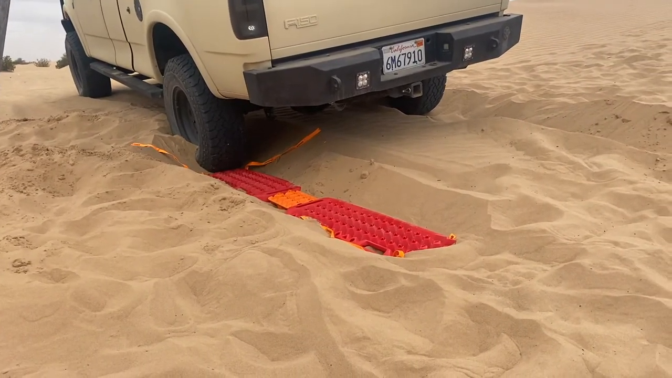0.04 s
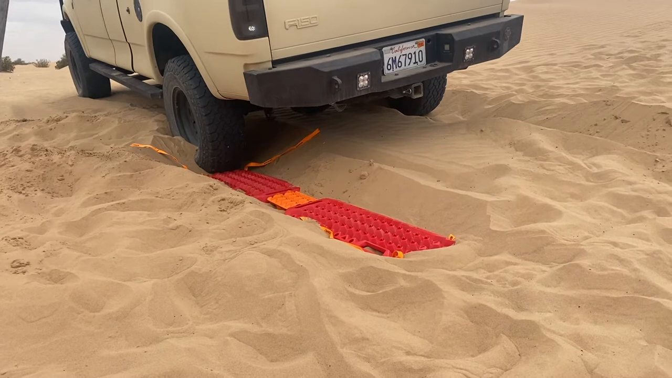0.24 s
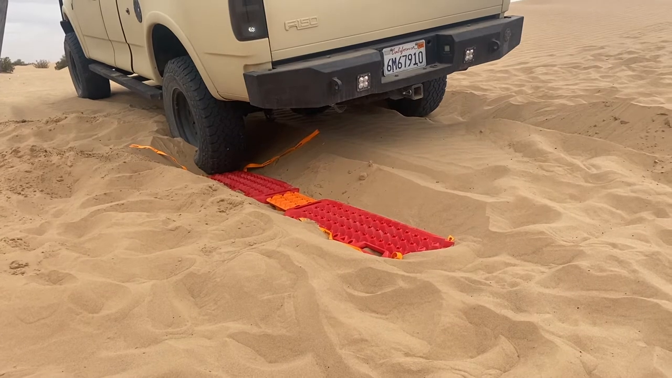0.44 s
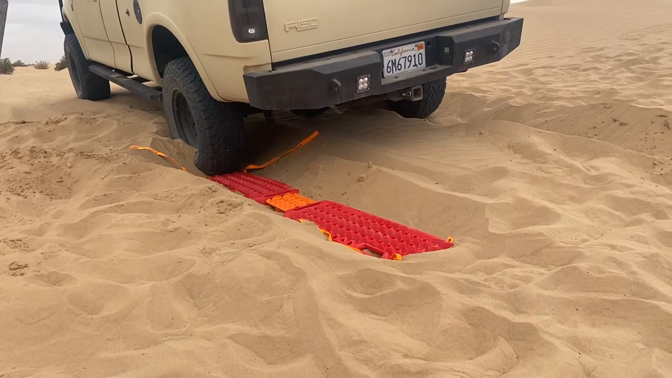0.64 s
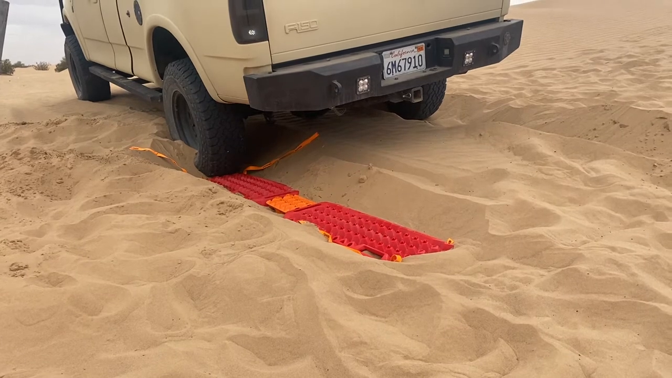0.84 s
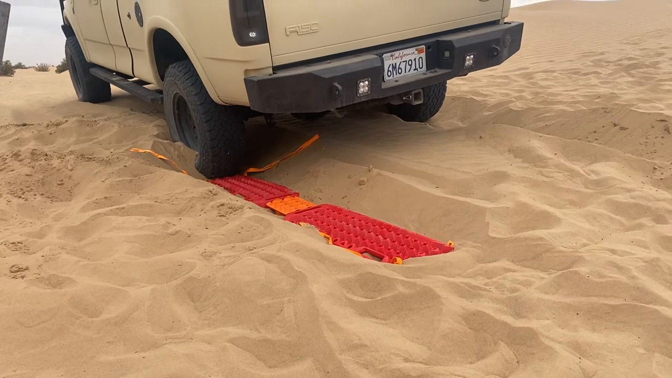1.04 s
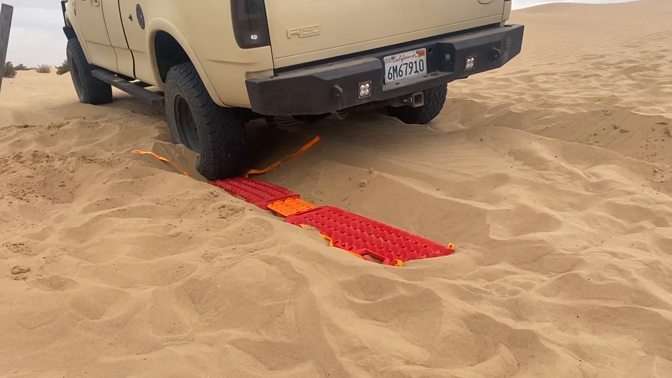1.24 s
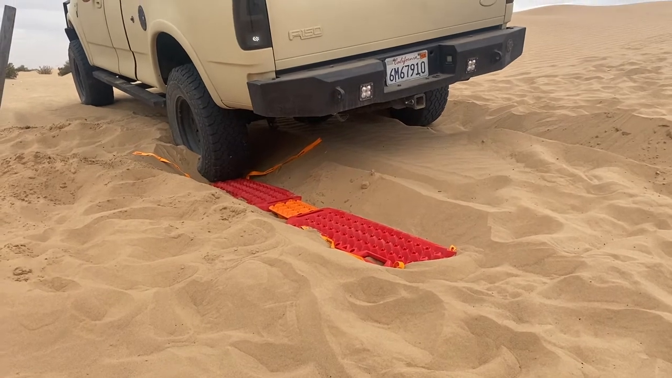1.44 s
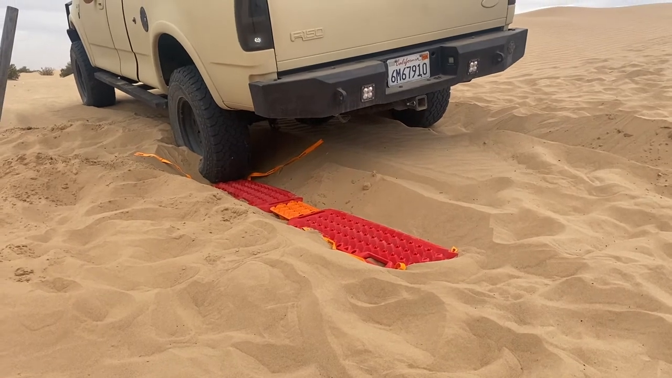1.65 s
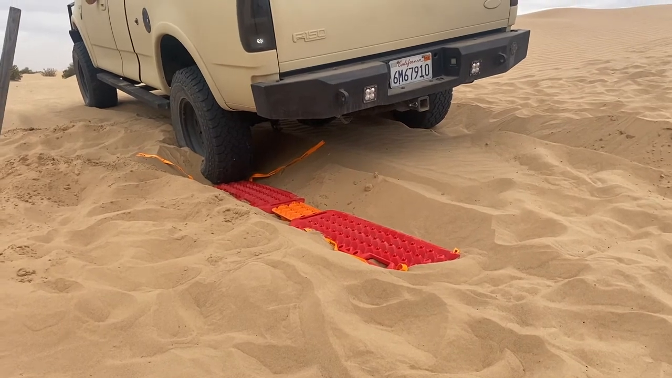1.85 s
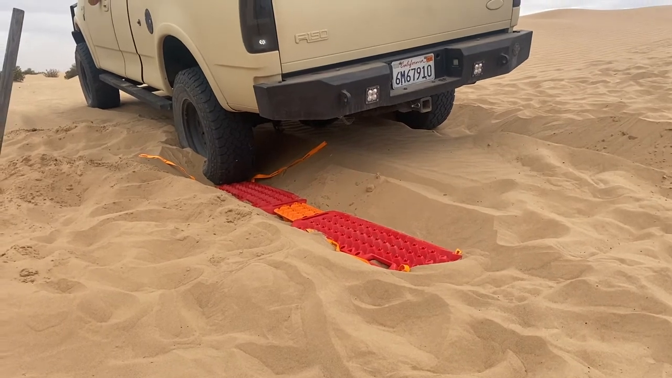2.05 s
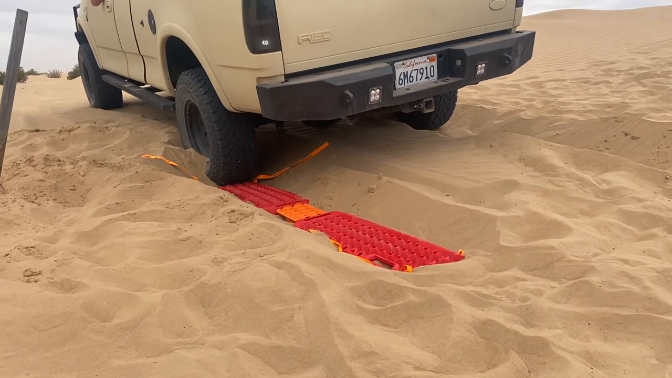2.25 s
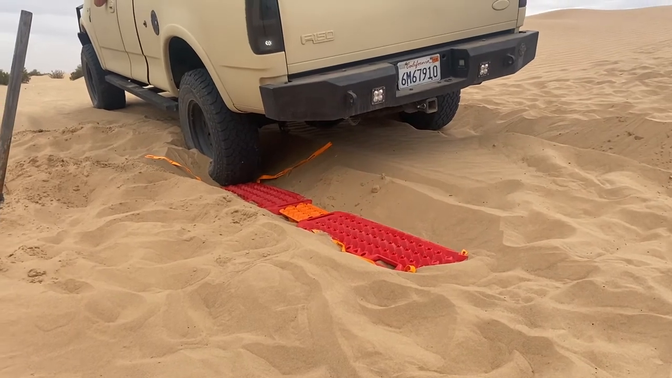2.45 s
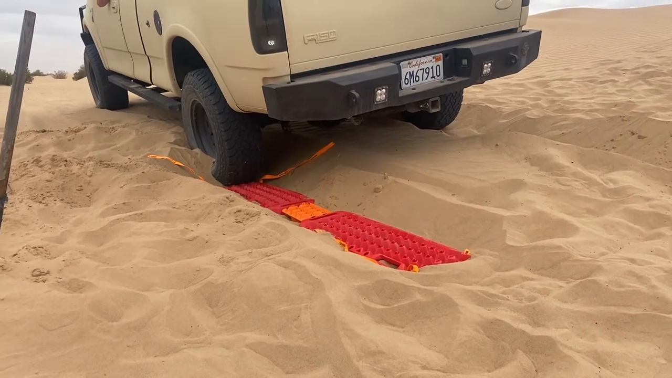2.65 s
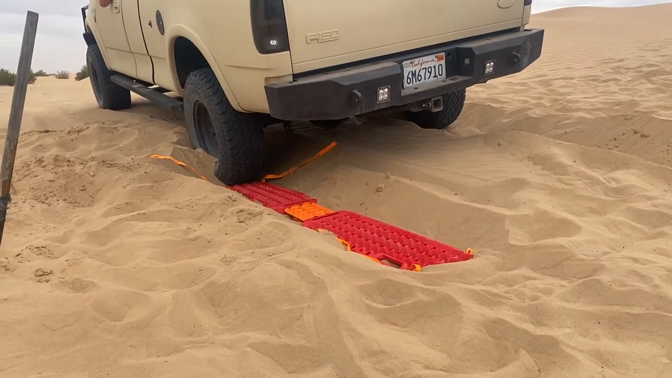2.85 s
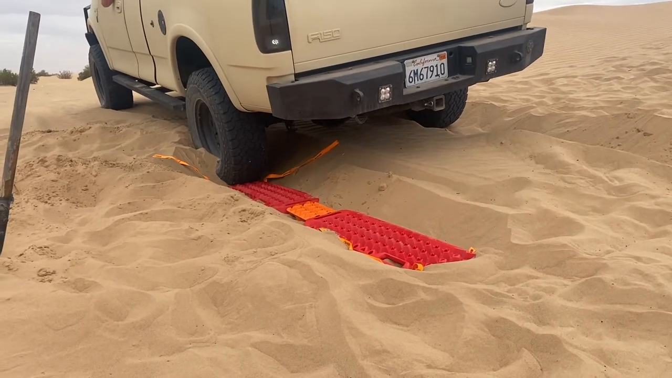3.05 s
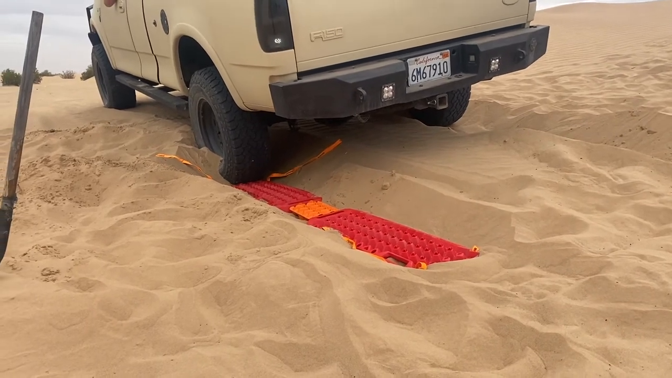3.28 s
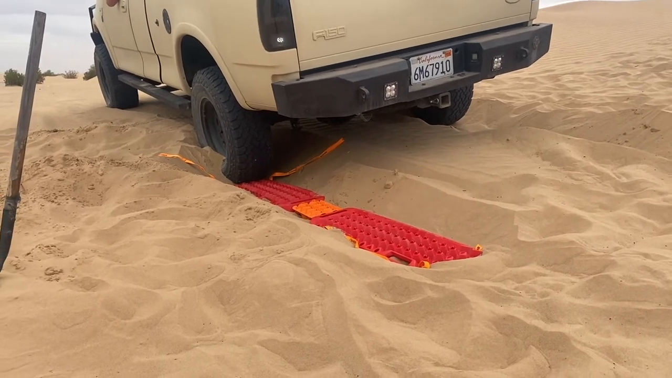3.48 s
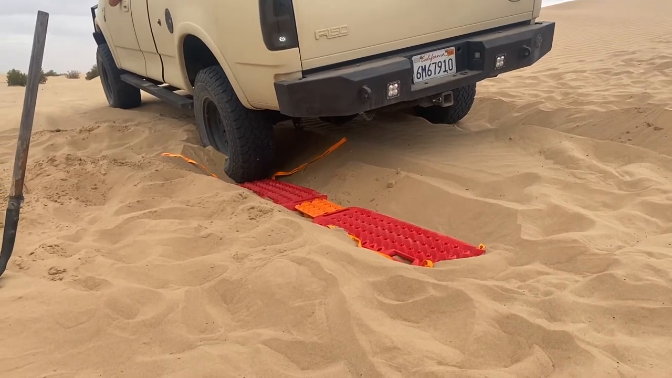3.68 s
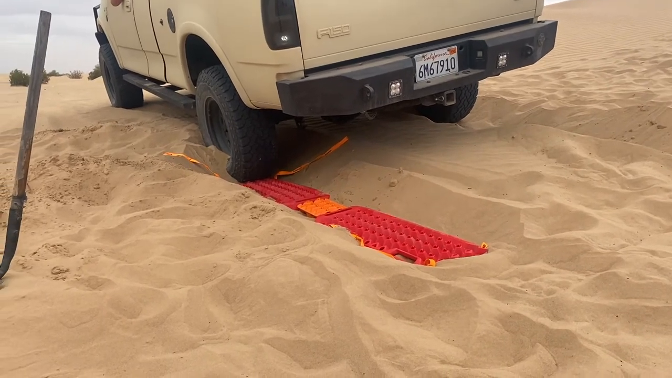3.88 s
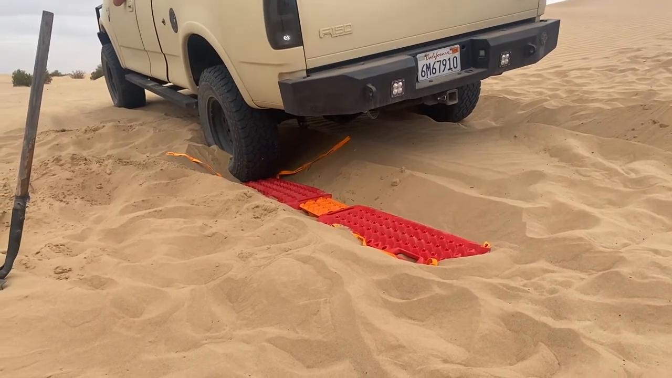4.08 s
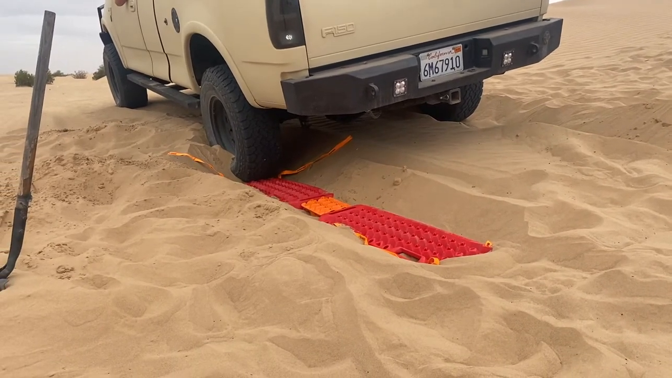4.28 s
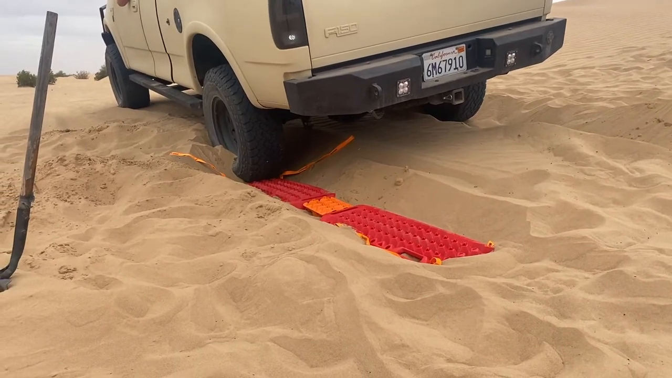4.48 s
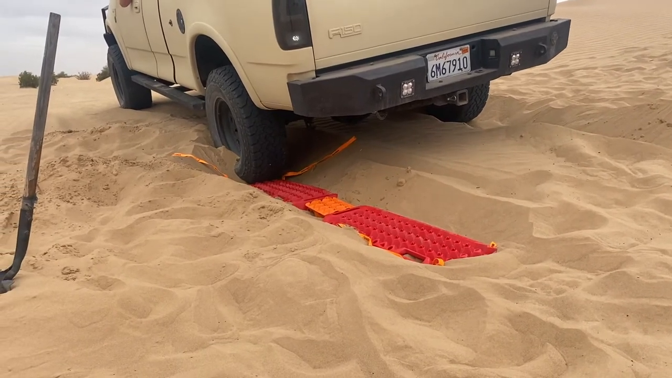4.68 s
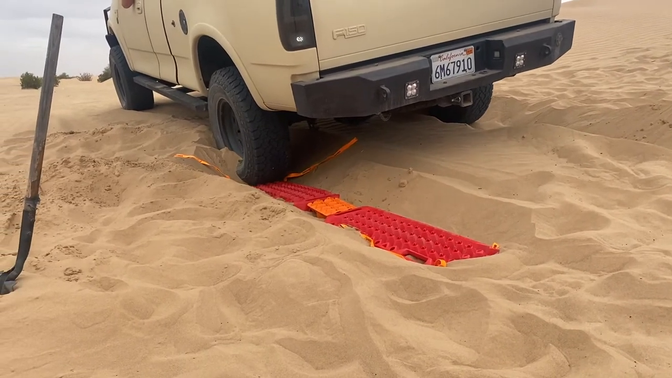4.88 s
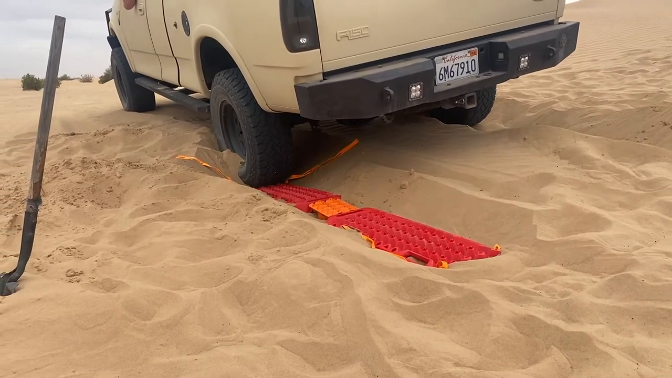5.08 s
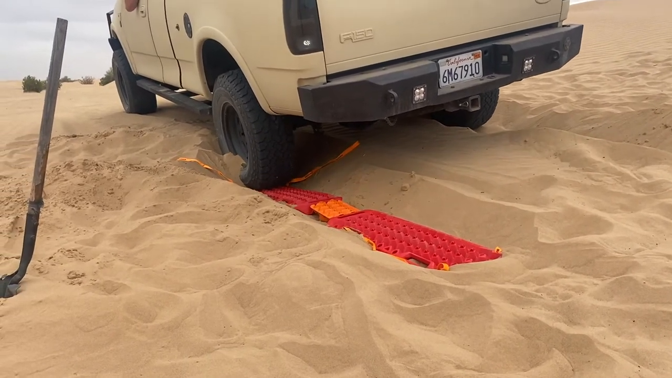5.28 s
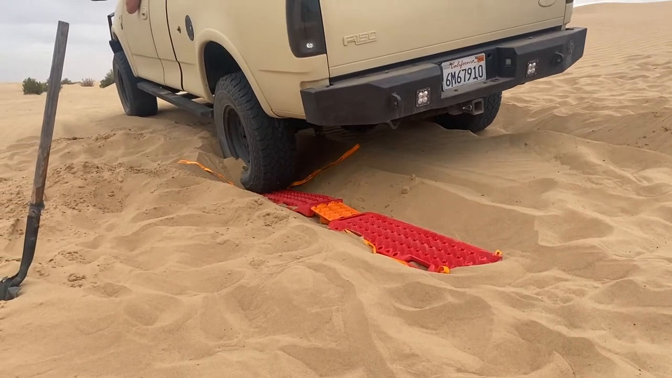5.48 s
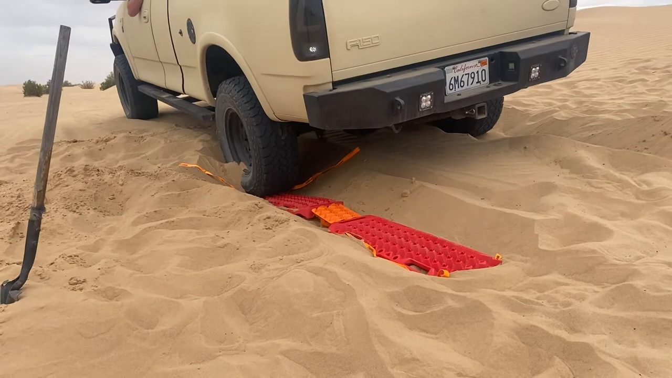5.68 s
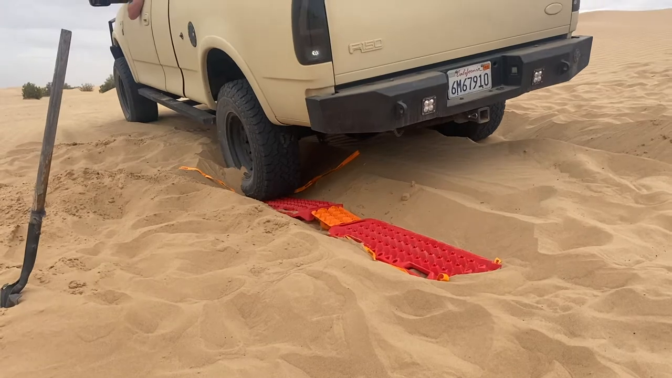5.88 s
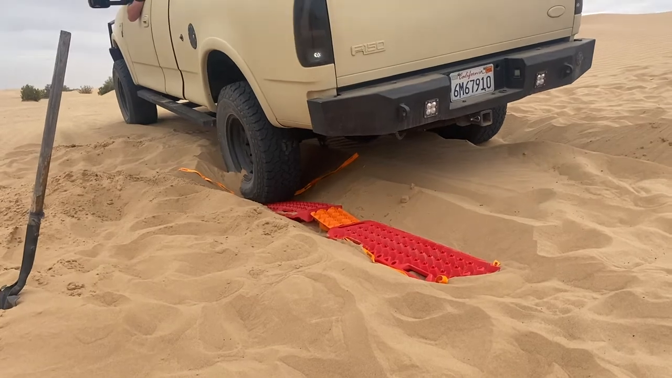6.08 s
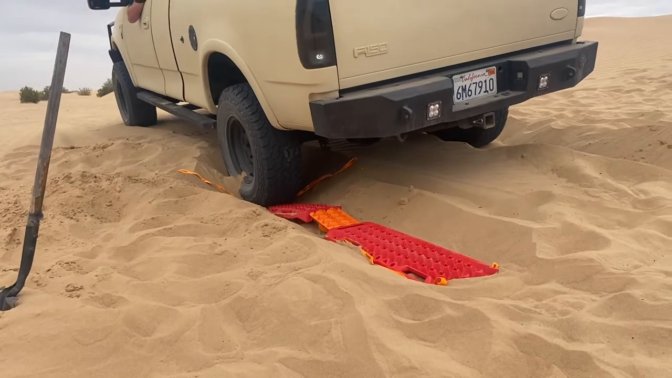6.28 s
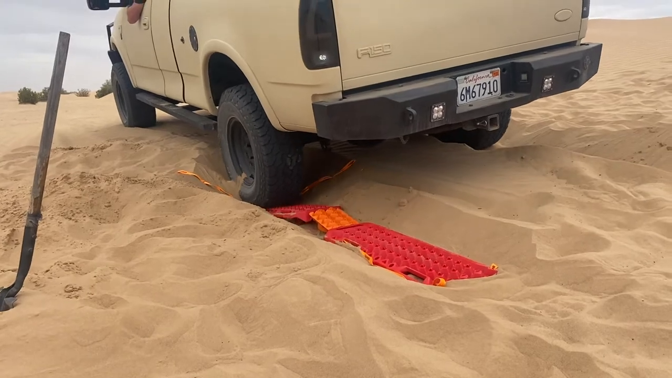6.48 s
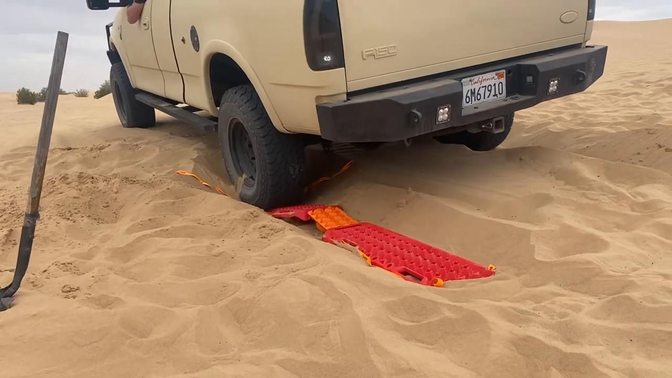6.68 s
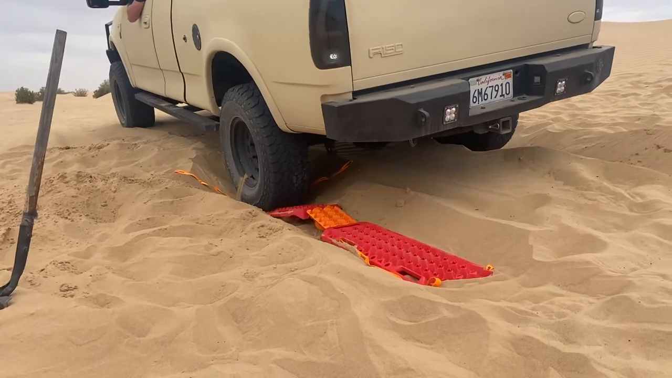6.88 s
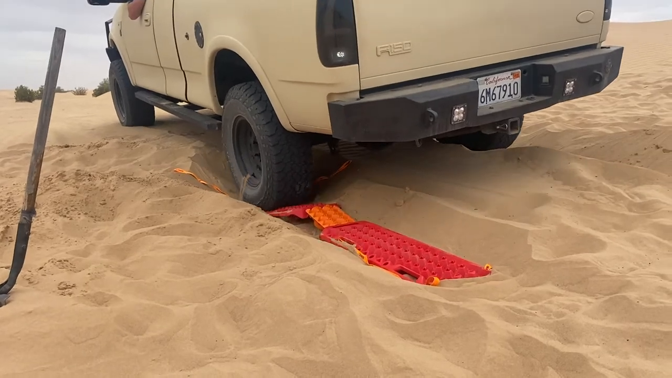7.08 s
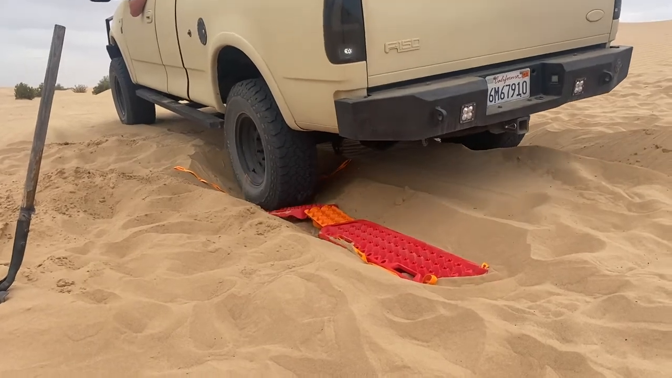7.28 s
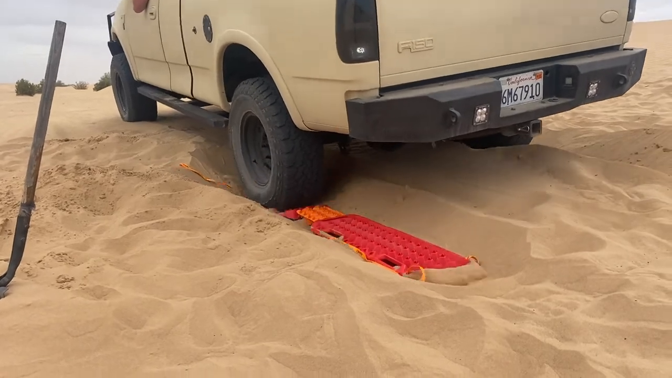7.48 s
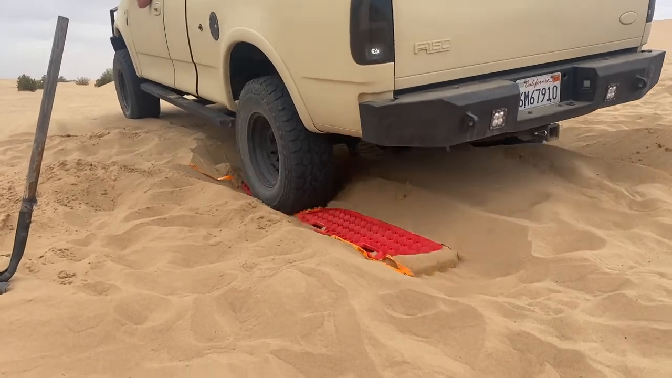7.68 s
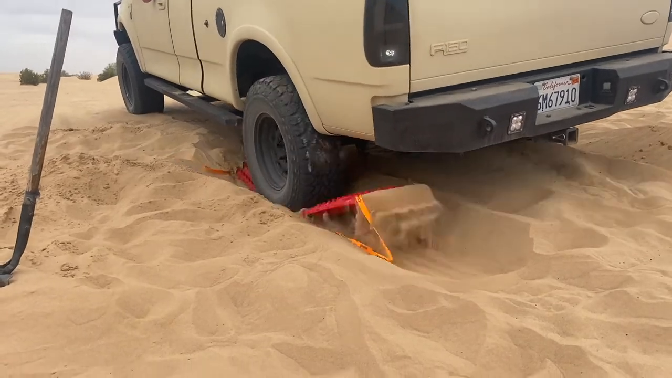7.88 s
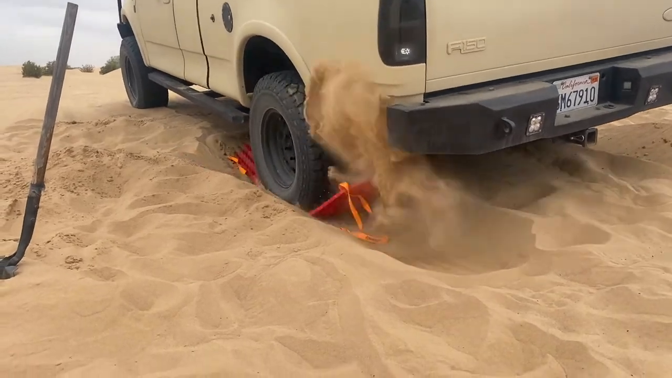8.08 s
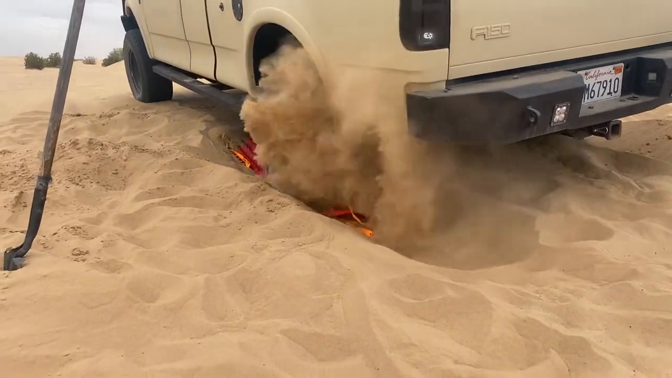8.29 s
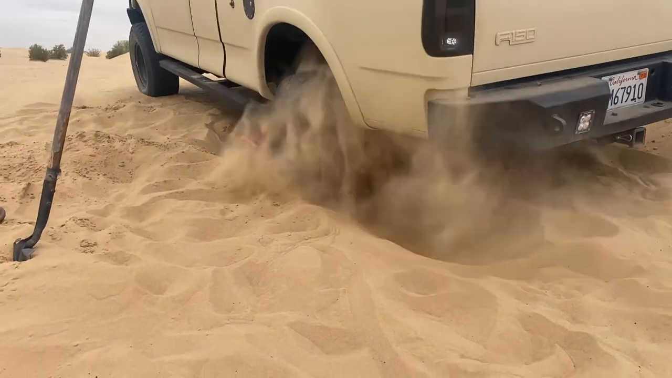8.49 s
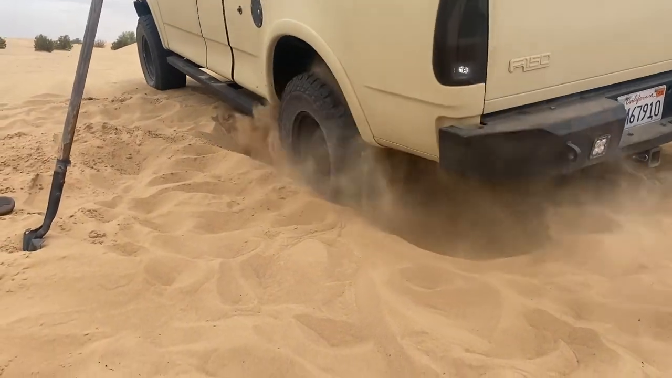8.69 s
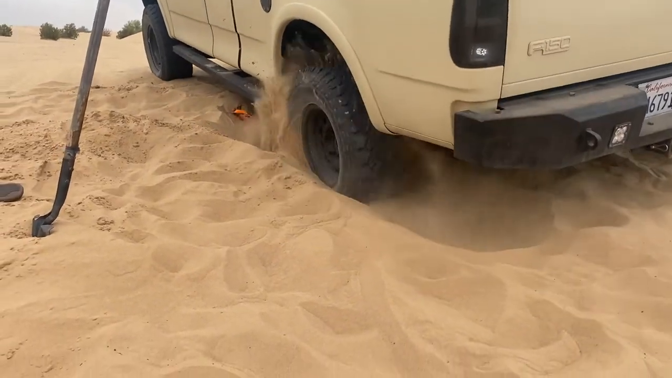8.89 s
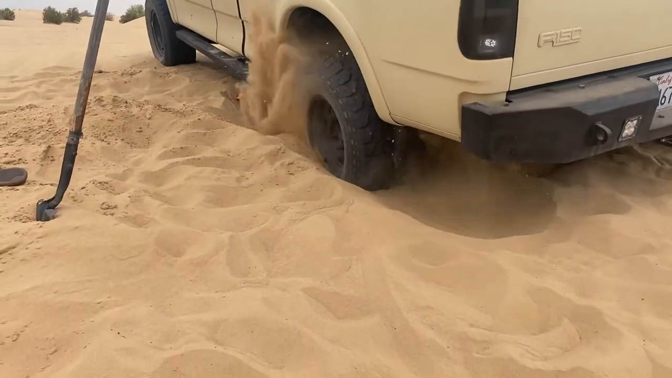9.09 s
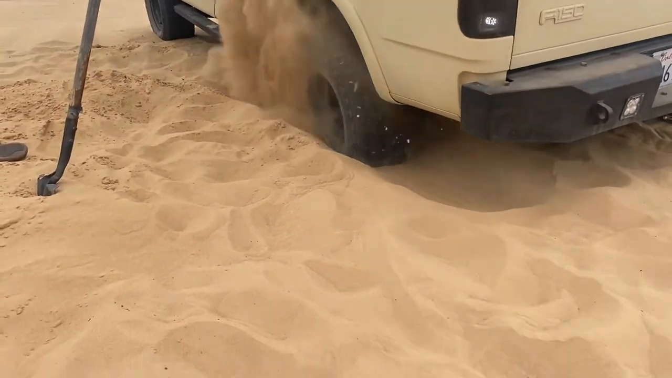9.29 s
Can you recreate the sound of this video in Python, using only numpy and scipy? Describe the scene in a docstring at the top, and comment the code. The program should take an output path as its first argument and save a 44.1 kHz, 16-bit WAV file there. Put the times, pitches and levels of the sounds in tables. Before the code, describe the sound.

Heard from a few metres away on an open dune, with no echo, a large petrol V8 truck puffs unevenly at low speed while a loose metal shield buzzes now and then. The engine strains, chugs and climbs in steps to a loud growl over a deep rumble. As it rises, a tyre drags a plastic board under with dull knocks, cracks and a short squeak, then sprays sand and ticks grit against the bodywork.

```python
"""On a dune in the open desert, with no echo, a stuck V8 pickup is heard from a few metres behind.
Its eight cylinders puff through the tailpipe, unevenly at first, then harder as the engine revs up.
Valves clatter and a loose metal shield buzzes. A rear tyre climbs a plastic traction board and drags
it under with knocks, cracks and squeaks, then spins and throws sand.
A deep rumble comes in as the engine starts to pull and grows as it revs."""
import sys
import numpy as np
from scipy import signal
from scipy.fft import rfft, irfft, next_fast_len
from scipy.io import wavfile
from scipy.ndimage import uniform_filter1d, minimum_filter1d

SR = 44100
rng = np.random.default_rng(int(sys.argv[2]) if len(sys.argv) > 2 else 0)


def put_to_file(sound):
    """Save the sound as 16-bit audio at rate SR, in the file named by the first command-line argument."""
    columns = np.atleast_2d(sound).T  # one column per channel
    safe = np.clip(columns, -1, 1)
    whole_steps = np.round(safe * 32767)
    wavfile.write(sys.argv[1], SR, whole_steps.astype(np.int16))


N = 411894
T = np.arange(N) / SR

IDLE_RPM = 829.6
CHUG_RPM, CHUG_WIDTH_RPM = 990, 50  # near this speed a weak cylinder makes a regular chug
# The tones of eight unequal cylinders. Tone k repeats k times per engine cycle (two turns of the crank).
# (tone number, level at light throttle [dB], level at full throttle [dB], level when racing [dB])
ENGINE_TONES = [(2, -13.5, -14.5, -9.5), (3, -15.5, -22, -11), (4, -4, -25.5, -27.5), (5, -2, -8.5, -10.5),
                (6, -9.0, -34, -18), (7, -10.5, -16.5, -11.0), (8, -2.0, -2.5, -4.5), (9, -15.5, -9.5, -12),
                (10, -15, -13, -10), (11, 0.5, 0.5, -1.5), (12, -16, -8.5, -10.5), (13, -4, -0.5, 2),
                (14, 1, 2, -8.0), (15, -6, -1, -2), (16, 11, 5, 0.5), (17, -7.5, -1.5, -0.5),
                (18, 3, 4.5, -2.5), (19, 2, -4, 6), (20, 0.5, -4, -5), (21, 0.5, 0, 7), (22, 2, 3.5, -6),
                (23, 0.5, -11.5, 2.5), (24, 2.5, 3.5, 5), (25, 5, 1, 1), (26, 3, -0.5, -2.5),
                (27, -5, -9, -10.5), (28, 4.5, 0, 0.5), (29, 2, -11, 2), (30, -2.5, -1.0, -13.5),
                (31, -5, 1.5, -3), (32, -11, -11, -6.5), (33, -1, 1.5, -4.5), (34, -10.0, -8, 2.5),
                (35, -1, -2, -5.5), (36, -2, 0.5, -5.5), (37, -3.5, -1, -3.5), (38, -6.5, 10.5, -0.5),
                (39, -12.5, 2.5, 3.5), (40, -13, 2.0, 0.5), (41, 2, -5.5, 0.5), (42, -7, 9.5, 8),
                (43, -2.5, -4.5, 15), (44, -0.5, -5.5, 8), (45, -8.5, 1, 1.5), (46, 0, -8, 4),
                (47, -2, 13, 4.5), (48, 0, -9, 10.5)]
# How well the silencer lets each pitch through: (frequency [Hz], level [dB])
SILENCER = [(30, -29.5), (52, -8.5), (75, 1), (100, 0), (122, -0.86), (145, -13), (170, -27), (210, -20),
            (250, -20), (305, -27.5), (350, -37.5), (450, -32.5), (640, -45), (760, -59), (1000, -62.5)]


def engine_note(cycles, rpm, unloaded):
    """Exhaust pulses make a stack of tones. Tone 8, one beat per firing, is the note; 16 is its octave."""
    doublings = np.log2(rpm / IDLE_RPM)
    stumble_db = -11.5 * near(T, 8.161, 0.007)
    drive_db = -28 + 17 * doublings + stumble_db
    throttle = np.clip((rpm - 1100) / 350, 0, 1)
    racing = at_full_revs(rpm)
    chug = near(rpm, CHUG_RPM, CHUG_WIDTH_RPM)
    unsteady = 1 - 0.6 * np.maximum(throttle, chug)
    cycles = cycles + 0.0025 * (1 - throttle) * drift(18)  # near idle the crank turns unevenly
    firing_db_per_doubling = {8: 8.5, 16: 0.5}
    levels = [row[1:] for row in ENGINE_TONES]
    levels += levels[-8:] * 2  # sixteen more tones repeat the last eight levels
    pipe = through_pipe(SILENCER, share=0.87)
    out = np.zeros(N)
    for k, (light_db, full_db, racing_db) in enumerate(levels, start=2):
        db = light_db + throttle * (full_db - light_db) + racing * (racing_db - full_db)
        db += drive_db + at_hz(pipe, k * rpm / 120)
        if k in firing_db_per_doubling:
            db += firing_db_per_doubling[k] * doublings - 1.5 * unloaded
            db += 1.45 * unsteady * drift(11)
        else:
            db -= 5 * unloaded * (k < 18)  # with no load the cylinders burn more alike
            db += 0.7 * unsteady * drift(11)
        db += 9.5 * unloaded * near(k * IDLE_RPM / 120, 219, 53)  # a burble around 219 Hz
        db += chug * (-2 if k == 16 else 2 * (k < 30))  # the octave loses to its neighbours
        db += 2 * racing * (k > 16)  # the racing engine growls
        db -= 0.45 * max(k - len(ENGINE_TONES), 0)  # the highest tones fade away
        sign = -1 if k % 8 else 1  # one weak cylinder dents the note once a cycle
        smear = 0.08 * abs(k - 8) * rng.standard_normal()  # the pipe shifts tones far from the note
        smear += 0.014 * max(k - 16, 0) * drift(40)  # high tones are rough
        out += sign * np.sqrt(2) * from_db(db) * np.cos(2 * np.pi * k * cycles + smear)
    return out


# The deep thump of uneven firings: (frequency [Hz], level [dB])
THUMP_SPECTRUM = [(15, -48), (28, -32.5), (40, -17), (52, -2), (65, -2), (85, -10), (110, -1), (135, -7.5),
                  (165, -12.5), (215, -11), (280, -25), (400, -32), (900, -65)]


def lope(firings, rpm, effort, unloaded):
    """No two firings burn alike: each adds a puff of random size, so the engine sounds lumpy."""
    level_db = -21.5 - 3.5 * effort - 5 * unloaded
    level_db += 7.5 * near(rpm, 1167, 170)  # strongest while the engine strains at low speed
    level_db -= 3 * near(rpm, CHUG_RPM, CHUG_WIDTH_RPM)
    fired = np.diff(np.floor(firings), prepend=0)
    puffs = np.tanh(2 * rng.standard_normal(N))
    spread = from_db(-17) * rng.standard_normal(N) * [[1], [-1]]
    return from_db(level_db) * rms_one(colour(fired * (puffs + spread), THUMP_SPECTRUM))


# Gas rushing out of the tailpipe: (frequency [Hz], level [dB])
GAS_SPECTRUM = [(100, -25), (175, -6), (255, 2.5), (300, -8), (340, -1.5), (420, -1), (560, -3.5),
                (610, -10.5), (660, -6), (750, -20.5), (1000, -26), (2000, -43.5)]


def gas_rush(cycles, firings, rpm, effort, unloaded):
    """Swirling gas leaves the pipe in unequal puffs, one per firing, and swells a little once a cycle."""
    level_db = -44.5 + 17.5 * effort + unloaded - at_full_revs(rpm)  # 1 dB up unloaded, 1 dB down racing
    flow = cycle_noise(cycles, repeating_share=0.25, side_db=-8)
    puffs = throb(firings, depth=0.24) * throb(cycles, depth=0.031) * from_db(2 * drift(55))
    return from_db(level_db) * colour(flow * puffs, through_pipe(GAS_SPECTRUM, share=0.45))


# Pitches at which the air in the tailpipe rings: (frequency [Hz], full boost [dB])
PIPE_RINGS = [(300, 6), (395, 7.5), (490, 7), (540, 3.5), (595, 5)]


def through_pipe(spectrum, share, half_width_hz=14):
    """Sound bouncing along the pipe lifts a few pitches; add a share of that boost to a spectrum."""
    hz = np.geomspace(spectrum[0][0], spectrum[-1][0], 400)
    boost_db = sum(db / (1 + ((hz - ring_hz) / half_width_hz) ** 2) for ring_hz, db in PIPE_RINGS)
    return np.transpose([hz, at_hz(spectrum, hz) + share * boost_db])


# How much louder the exhaust is on the left: (frequency [Hz], left minus right [dB])
LEFT_LEVEL = [(60, -.9), (110, -1.3), (220, -1.7), (450, -1.9), (1000, -.3)]
# How far its wave is ahead on the left: (frequency [Hz], phase lead [rad])
LEFT_LEAD = [(0, 0), (340, -0.21), (860, 0.14), (1120, 0.15), (1380, 0.5), (1810, 0.2), (2760, 0.23)]


def place_exhaust(x):
    """The exhaust reaches left and right with slightly different level and timing."""
    size = next_fast_len(N + SR)
    hz = np.arange(size // 2 + 1) * SR / size
    half = np.array([[0.5], [-0.5]])
    gain = from_db(half * at_hz(LEFT_LEVEL, hz))
    shift = np.exp(1j * half * at_hz(LEFT_LEAD, hz))
    return irfft(rfft(x, size) * gain * shift, size)[:, :N]


# Valves and cooling fan together: (frequency [Hz], level [dB])
MACHINERY_SPECTRUM = [(400, -17.5), (650, 5.5), (750, -2.5), (830, 1), (900, 2), (1050, -7.5), (1160, -3.5),
                      (1430, -9.5), (1610, -7), (1800, -12.5), (1980, -11.5), (2280, -16.5), (3000, -18.5),
                      (4500, -25), (7000, -33), (9000, -50.5), (16000, -44.5)]


def valves_and_fan(cycles, effort):
    """The valves clatter the same way every cycle, inside the whoosh of the fan."""
    clatter = cycle_noise(cycles, repeating_share=0.6, side_db=-7.5)
    return from_db(-52 + 17.5 * effort) * colour(clatter, MACHINERY_SPECTRUM)


def whine(rpm):
    """Two thin, wavering tones ring in the engine bay, loudest near 900 rpm."""
    level_db = -69.5 + 4.5 * near(rpm, 900, 29)
    out = 0
    for hz, db in [(1603, -6), (1704, 0)]:
        out += from_db(level_db + db + 3 * drift(22)) * np.sin(2 * np.pi * hz * T + drift(7.2))
    return out


# When the loose metal shield buzzes: (middle time [s], half-length [s], level [dB])
BUZZ_SPELLS = [(.08, 0.051, -53.5), (.235, 0.034, -56.5), (1.5, 0.062, -67), (1.64, 0.079, -54),
               (2.9, 1, -63.5), (6.52, 0.16, -61)]
# Pitches at which it rings: (frequency [Hz], width [Hz], level [dB])
SHIELD_RINGS = [(2000, 45, -7.5), (2620, 130, -6.5), (3010, 42, -1), (3500, 240, -16), (4000, 210, -12.5),
                (4760, 540, -17.5), (6730, 540, -19.5), (7850, 290, -26)]


def loose_shield(firings, ring_hz=2995):
    """The loose sheet chatters once per firing and sings hoarsely at its strongest pitch."""
    chatter = resonate(stereo_noise(side_db=-3) * throb(firings, depth=0.5), SHIELD_RINGS)
    ring = np.sqrt(2) * np.sin(2 * np.pi * ring_hz * T + 1.1 * drift(170)) * throb(firings, depth=0.3)
    flutter = from_db(drift(60))
    return swells(BUZZ_SPELLS) * flutter * (from_db(-2) * chatter + from_db(-7) * ring)


# Dull blows of the tyre on the board: (time [s], level [dB], pitch [Hz], time to fade by 60 dB [s])
BOARD_KNOCKS = [(1.108, -16, 170, 0.082), (1.328, -23, 398, 0.07), (1.436, -20.5, 290, .05),
                (1.594, -18, 596, 0.014), (1.606, -22.5, 465, 0.052), (1.609, -14.5, 287, 0.066),
                (5.937, -17, 197, 0.078), (6.165, -9.5, 277, 0.047), (6.168, -20.5, 544, .03),
                (6.275, -14.5, 190, 0.068), (6.631, -19, 350, 0.047), (6.919, -16.5, 450, 0.028),
                (7.046, -22, 480, 0.044), (7.299, -15, 315, 0.062), (7.778, -22.5, 799, 0.12),
                (7.785, -12, 212, .08), (7.7896, -4, 523, 0.0095), (7.796, -19.5, 590, 0.097),
                (7.798, -3, 458, 0.016), (8.076, -22.5, 710, 0.053), (8.393, -5, 482, 0.032),
                (8.398, -16, 590, 0.1), (8.471, -8.5, 630, 0.039)]


def knocks(rattle=0.32, size=8192):
    """Each soft blow bends the board, which rings briefly at one pitch with a dull rattle around it."""
    out, t = np.zeros((2, N)), T[:size]
    for s, db, hz, fade_s in BOARD_KNOCKS:
        around_pitch = signal.butter(2, [hz / 2, 2 * hz], "band", fs=SR, output="sos")
        shake = rms_one(signal.sosfilt(around_pitch, stereo_noise(side_db=-1, size=size)))
        sound = from_db(db - 60 * t / fade_s) * (np.sin(2 * np.pi * hz * t) + rattle * shake)
        muffle = signal.butter(3, 2 * hz, fs=SR, output="sos")
        add(out, s, signal.sosfilt(muffle, sound))
    return out


# Single cracks of the plastic: (time [s], level [dB])
BOARD_CRACKS = [(7.457, -27), (7.478, -29), (7.499, -28.5), (7.791, -31), (8.079, -32.5), (8.127, -31),
                (8.239, -28.5), (8.259, -22), (8.272, -20), (8.296, -19), (8.316, -22), (8.351, -27),
                (8.393, -16.5)]


def cracks():
    """The plastic snaps under the tread, and each snap rings the board."""
    snaps = np.zeros((2, N))
    for s, db in BOARD_CRACKS:
        add(snaps, s, burst(db, fade_s=0.017, side_db=-11, snap=10.7))
    return ring_board(snaps)


# When the board crunches: (middle time [s], half-length [s], level [dB])
CRUNCH_SPELLS = [(4.1, 0.056, -57), (7.4, 0.091, -44.5), (7.79, .014, -37.5), (8.26, 0.065, -43),
                 (8.33, 0.022, -34)]


def crunch():
    """As the tread drags the board under, a dense run of tiny cracks rings it."""
    snaps = grains(side_db=-6, uneven_db=1)
    return 2 * ring_board(snaps * swells(CRUNCH_SPELLS))


# Pitches at which the plastic board rings: (frequency [Hz], width [Hz], level [dB])
BOARD_RINGS = [(876, 180, 2), (1380, 340, -2), (1740, 260, 0), (2070, 220, -12), (4000, 1700, -30)]


def ring_board(snaps):
    """Snaps lose a little treble and set the board ringing."""
    softened = signal.lfilter([0.4], [1, -0.6], snaps)
    return resonate(softened, BOARD_RINGS)


# When the tyre churns against the board: (middle time [s], half-length [s], level [dB])
CHURN_SPELLS = [(5.95, 0.031, -28.5), (6.2, .06, -30.5), (6.69, 0.076, -20), (6.935, 0.029, -23.5),
                (7.27, 0.15, -24), (8.37, 0.13, -14)]
# The low groan it makes: (frequency [Hz], level [dB])
GROAN_SPECTRUM = [(70, -10.5), (170, 7), (320, -2.5), (600, -15), (900, -31.5), (2000, -63.5)]


def churn(judder_db=3):
    """The tread judders and groans as it digs in."""
    judder = from_db(judder_db * np.tanh(drift(50)))
    return swells(CHURN_SPELLS) * judder * colour(stereo_noise(side_db=-9), GROAN_SPECTRUM)


# The course of one squeak as the tyre slips off the board: (time [s], pitch [Hz], level [dB])
SQUEAK_CURVE = [(8.29, 2250, -56), (8.315, 2380, -35), (8.335, 2200, -31), (8.355, 2090, -33),
                (8.375, 2020, -54)]


def squeak(octave_db=-17):
    """Rubber grips and slips on plastic very quickly, making a rasping tone and its octave."""
    hz, db = in_time(SQUEAK_CURVE)
    rough_hz = hz * (1 + 0.06 * drift(900))
    phase = 2 * np.pi * np.cumsum(rough_hz) / SR
    sounding = (T > SQUEAK_CURVE[0][0]) & (T < SQUEAK_CURVE[-1][0])
    rasp = from_db(2.5 * drift(600))
    return sounding * from_db(db) * rasp * (np.sin(phase) + from_db(octave_db) * np.sin(2 * phase))


# Small creaks of the tread: (time [s], pitch [Hz], level [dB])
TREAD_CREAKS = [(4.12, 2730, -58), (4.146, 2500, -61), (4.184, 2620, -56), (4.216, 2450, -59),
                (4.808, 2500, -54)]


def creaks(half_length_s=0.007, fall_hz_per_s=6000):
    """The tread slips a little on the plastic, making short, rough tones that fall in pitch."""
    out, roughness = 0, 1.3 * drift(700)
    for s, hz, db in TREAD_CREAKS:
        t = T - s
        phase = 2 * np.pi * (hz - fall_hz_per_s * t / 2) * t
        out += from_db(db) * near(T, s, half_length_s) * np.sin(phase + roughness)
    return out


# Scuffs and flings of sand: (middle time [s], half-length [s], level [dB])
SAND_FLINGS = [(7.79, 0.011, -44), (8.01, 0.051, -44.5), (8.3, 0.11, -41.5), (8.53, 0.079, -36.5),
               (8.96, 0.064, -57), (9.22, 0.078, -49.5)]
# The hiss of flying sand: (frequency [Hz], level [dB])
SAND_SPECTRUM = [(300, -12), (900, 6), (2000, 3.5), (2800, -3), (3400, -12.5), (4500, -11), (7500, -13),
                 (9000, -24), (12000, -15), (16000, -36.5)]


def sand(effort, slip_s=5.2):
    """Once the tyre slips, its tread throws countless grains of unequal size, in clumps."""
    stream = ramp(slip_s, rise_s=0.38) * from_db(-65 + 21 * effort)
    spray = colour(grains(side_db=-2.5, uneven_db=2.5), SAND_SPECTRUM)
    clumps = from_db(1.5 * drift(70))
    return np.hypot(stream, swells(SAND_FLINGS)) * clumps * spray


# Bits of grit hitting the truck: (time [s], relative level [dB])
GRIT_HITS = [(7.935, -47), (8.026, -39.5), (8.049, -39), (8.114, -44), (8.274, -61), (8.482, -40),
             (8.509, -37.5), (8.557, -49)]
# Their bright tick: (frequency [Hz], level [dB])
GRIT_SPECTRUM = [(1000, -9), (3000, 0), (7500, -14.5), (10000, -25.5), (16000, -17.5)]


def grit(gain_db=6):
    """Flying grit ticks against the bodywork."""
    ticks = np.zeros((2, N))
    for s, db in GRIT_HITS:
        add(ticks, s, burst(db + gain_db, fade_s=0.018, side_db=-5, snap=2.7))
    return colour(ticks, GRIT_SPECTRUM)


# How loud the deep rumble is: (time [s], level [dB])
RUMBLE_LEVEL = [(0, -64), (1, -63.5), (1.2, -45), (6.5, -40), (7.3, -41.5), (9.34, -35.5)]
# Its low pitches: (frequency [Hz], level [dB])
RUMBLE_SPECTRUM = [(8, -12.5), (20, -6.5), (35, 4), (60, -1.5), (200, -38.5)]


def low_rumble():
    """A deep rumble comes in as the engine starts to pull and grows as it revs."""
    level_db, = in_time(RUMBLE_LEVEL)
    return from_db(level_db) * colour(stereo_noise(side_db=-13), RUMBLE_SPECTRUM)


# A bright background hiss: (frequency [Hz], level [dB])
HISS_SPECTRUM = [(3000, -3), (7500, -3.5), (10000, -9), (12000, 6.5), (13000, -11.5)]


def hiss():
    """A faint, steady hiss lies behind everything."""
    return from_db(-78) * colour(stereo_noise(side_db=-6.5), HISS_SPECTRUM)


# The two pitches of a very high whistle: (frequency [Hz], width [Hz], level [dB])
WHISTLE_PITCHES = [(11880, 35, 0), (12107, 35, 0)]


def whistle():
    """Two narrow bands of noise make a faint, steady whistle."""
    return from_db(-86) * resonate(stereo_noise(side_db=-4.5), WHISTLE_PITCHES)


def from_db(db):
    """Turn decibels into a number to multiply by."""
    return np.exp(np.asarray(db) * (np.log(10) / 20))


def rms_one(x):
    """Scale a signal so that its average strength (rms) is 1."""
    return x / np.sqrt(np.mean(x ** 2) + 1e-20)


def in_time(rows):
    """Join a table's points with straight lines: one curve for each column after the time."""
    s, *columns = np.transpose(rows)
    return [np.interp(T, s, column) for column in columns]


def at_hz(points, hz):
    """Read between a table's frequencies, with every octave equally wide."""
    frequencies, values = np.transpose(points)
    return np.interp(np.log(np.maximum(hz, 1)), np.log(frequencies), values)


def near(x, centre, width):
    """A bell shape: 1 at the centre, falling away on both sides."""
    return np.exp(-0.5 * ((x - centre) / width) ** 2)


def swells(rows):
    """A loudness curve with one smooth bump for each row."""
    return sum(from_db(db) * near(T, s, half_s) for s, half_s, db in rows)


def ramp(start_s, rise_s):
    """Go from 0 to 1 in a straight line."""
    return np.clip((T - start_s) / rise_s, 0, 1)


def at_full_revs(rpm):
    """Go from 0 to 1 as the wheel spins free and the engine races."""
    return np.clip((rpm - 1610) / 260, 0, 1)


def throb(turns, depth):
    """A loudness curve that swells once a turn."""
    return rms_one(np.exp(depth * np.cos(2 * np.pi * turns)))


def drift(rate):
    """A random wander of typical size 1, with `rate` new values a second."""
    values = rng.standard_normal(16384)
    return rms_one(np.interp(T * rate, np.arange(len(values)), values))


def stereo_noise(side_db, size=N):
    """White noise in two channels; a higher side_db makes it wider."""
    mid, side = rng.standard_normal((2, size))
    return rms_one(mid + from_db(side_db) * side * [[1], [-1]])


def grains(side_db, uneven_db):
    """Gritty noise: a few random samples are much louder than the rest."""
    return rms_one(stereo_noise(side_db) * from_db(uneven_db * rng.exponential(1, N)))


def cycle_noise(cycles, repeating_share, side_db, size=2048):
    """Noise that is partly fresh and partly the same in every engine cycle."""
    position = cycles % 1 * size
    pattern = stereo_noise(side_db, size)
    repeating = np.array([np.interp(position, np.arange(size), side, period=size) for side in pattern])
    speed_gain = np.sqrt(np.gradient(cycles) * size)  # keeps the power per Hz as the pattern speeds up
    fresh = stereo_noise(side_db)
    return np.sqrt(repeating_share) * speed_gain * repeating + np.sqrt(1 - repeating_share) * fresh


def burst(db, fade_s, side_db, snap, size=8192):
    """A small hit: a sharp first push, then noise that dies by 60 dB in fade_s."""
    sound = stereo_noise(side_db, size) * from_db(-60 * T[:size] / fade_s)
    sound[:, 0] += snap
    return from_db(db) * sound


def colour(x, spectrum, size=8192):
    """Give a sound the shape of a spectrum; white noise keeps its overall power."""
    hz = np.arange(size // 2 + 1) * SR / size
    octaves_past_end = np.log2(np.maximum(hz / spectrum[-1][0], 1))
    db = at_hz(spectrum, hz) - 20 * octaves_past_end
    cepstrum = irfft(np.log(from_db(db)))
    cepstrum[1:size // 2] *= 2  # minimum phase: the filter rings after a hit, never before it
    cepstrum[size // 2 + 1:] = 0
    response = irfft(np.exp(rfft(cepstrum)))
    return signal.oaconvolve(np.atleast_2d(x), response[None] / np.linalg.norm(response), axes=1)[:, :N]


def resonate(x, rings):
    """Let a sound ring at several pitches at once; white noise keeps about the same power."""
    out, power = 0, 0
    for k, (hz, width_hz, db) in enumerate(rings):
        decay = np.exp(-np.pi * width_hz / SR)
        scale = (1 - decay ** 2) / 2
        feed = (-1) ** k * from_db(db) * scale * np.array([1, 0, -1])
        feedback = [1, -2 * decay * np.cos(2 * np.pi * hz / SR), decay ** 2]
        out = out + signal.lfilter(feed, feedback, x + 1e-18)
        power += from_db(db) ** 2 * scale
    return out / np.sqrt(power)


def add(track, s, sound):
    """Mix a sound in at time s."""
    start = round(s * SR)
    track[:, start:start + sound.shape[1]] += sound[:, :N - start]


# How fast the engine turns: (time [s], speed [rpm])
ENGINE_SPEED = [(0, 843), (.55, 811), (1.33, 820), (1.68, 898), (3.65, 903), (4.2, 972), (6.05, 988),
                (6.37, 1022), (6.68, 1155), (6.82, 1165), (7.07, 1135), (7.25, 1330), (7.42, 1458),
                (7.6, 1529), (8.15, 1534), (8.42, 1785), (8.59, 1906), (8.78, 1912), (9.1, 2200),
                (9.34, 2280)]


def scene():
    """Engine speed drives the exhaust, engine bay and sand stream; the board sounds at set times."""
    rpm, = in_time(ENGINE_SPEED)
    cycles = np.cumsum(rpm / 120) / SR  # one engine cycle takes two turns of the crank
    firings = 8 * cycles
    effort = np.log2(np.clip(rpm, 839, 1810) / 839)  # doublings of speed, from barely open to wide open
    unloaded = 1 - ramp(1.08, rise_s=0.089)  # 1 until the engine starts to pull
    exhaust = engine_note(cycles, rpm, unloaded) + lope(firings, rpm, effort, unloaded)
    exhaust += gas_rush(cycles, firings, rpm, effort, unloaded)
    engine_bay = valves_and_fan(cycles, effort) + whine(rpm) + loose_shield(firings)
    background = low_rumble() + hiss() + whistle()
    tyre = sand(effort) + churn() + crunch() + knocks() + cracks() + grit() + creaks() + squeak()
    return place_exhaust(exhaust) + engine_bay + tyre + background


def record(dry, ceiling=0.95, cutoff_hz=15700, size=500):
    """Turn the level down smoothly around peaks that are too loud, then cut the highest treble."""
    allowed = np.minimum(1, ceiling / (np.abs(dry).max(axis=0) + 1e-9))
    held = minimum_filter1d(allowed, 2 * size)
    gain = uniform_filter1d(uniform_filter1d(held, size), size)
    return signal.sosfilt(signal.cheby2(12, 70, cutoff_hz, fs=SR, output="sos"), dry * gain)


dry = scene()
out = record(dry)
put_to_file(out)
```